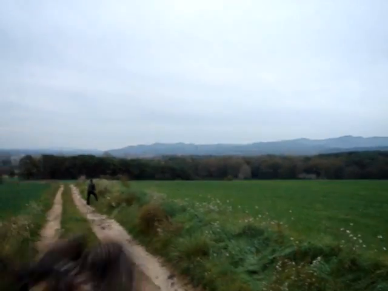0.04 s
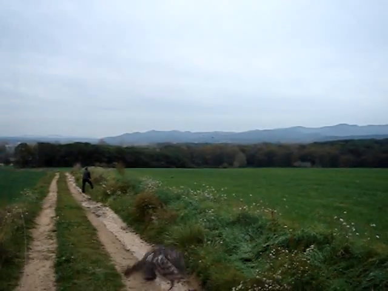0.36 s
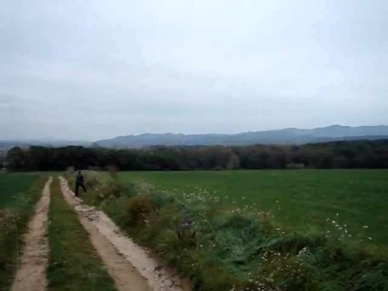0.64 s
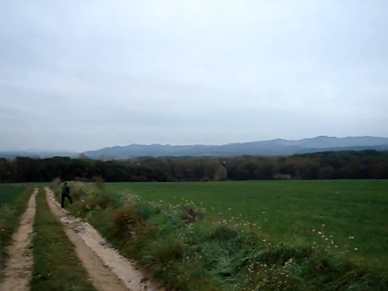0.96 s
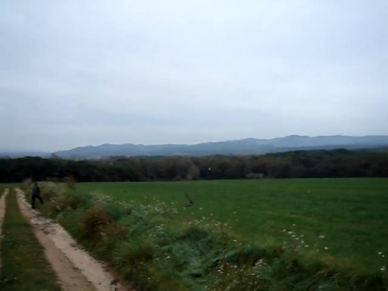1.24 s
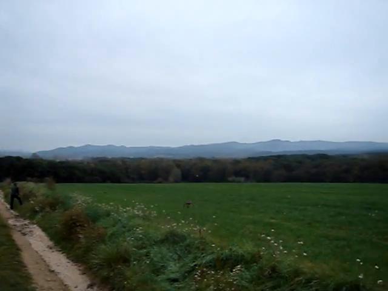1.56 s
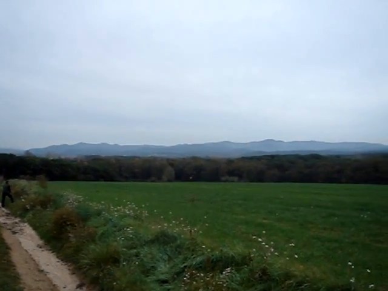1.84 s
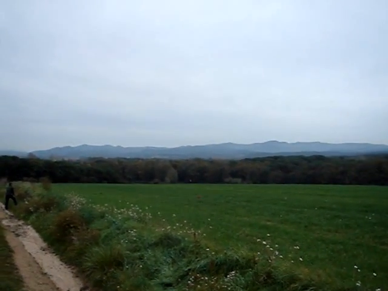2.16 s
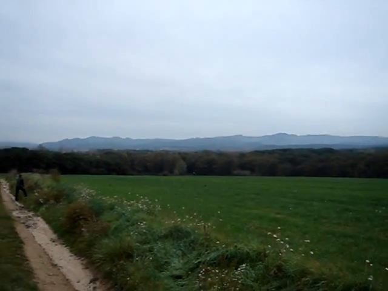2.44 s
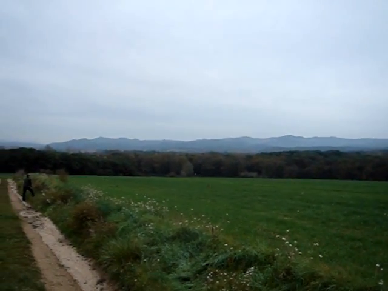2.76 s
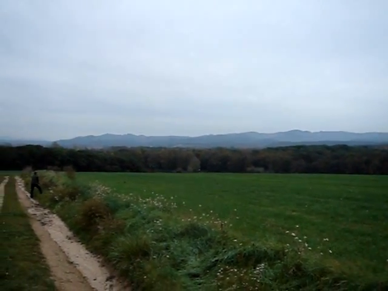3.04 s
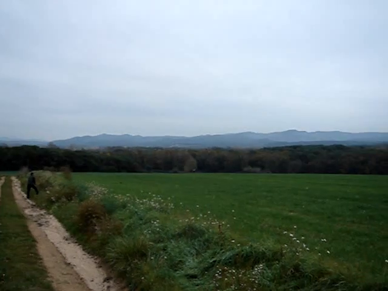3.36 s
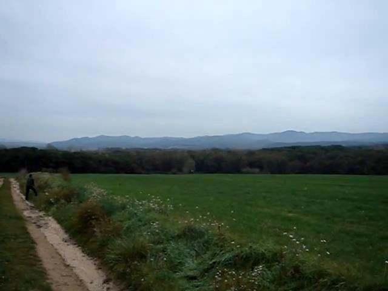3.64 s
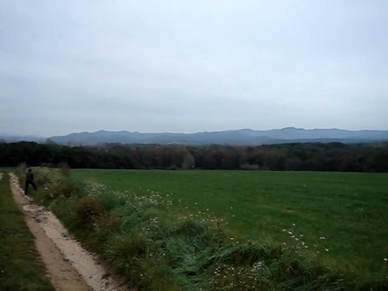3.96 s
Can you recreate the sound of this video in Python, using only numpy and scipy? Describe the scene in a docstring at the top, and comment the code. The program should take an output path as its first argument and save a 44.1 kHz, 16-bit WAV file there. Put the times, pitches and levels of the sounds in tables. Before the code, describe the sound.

Small metal bells jingle on a bird flying away, fading over faint wind.

```python
"""Two small metal bells jingle on a hawk's legs as it takes off beside the microphone and flies away
low over a field. Each wingbeat throws a pellet against a bell's shell: it rattles, the shell rings, and
the pellet chokes the ring. With distance the jingle grows fainter and duller.
The first wingbeat buffets the microphone. Light wind and a faint hum lie far off, a breeze rumbles
softly on the microphone, and one tap and one clink sound close by."""
import sys
import numpy as np
from scipy import signal
from scipy.io import wavfile
from scipy.ndimage import uniform_filter1d

SR = 44100
rng = np.random.default_rng(int(sys.argv[2]) if len(sys.argv) > 2 else 0)


def dump_mix(stems):
    """Bounce the given channels to the path in sys.argv[1] as a 16-bit WAV at rate SR."""
    frames = np.atleast_2d(stems).T  # one column per channel
    limited = np.clip(frames, -1, 1)  # hard clip at full scale
    pcm = np.round(limited * 32767).astype(np.int16)
    wavfile.write(sys.argv[1], SR, pcm)


N = 4 * SR
BELL_ATTACK_S = 0.001

# the hawk's flight away from the microphone (time [s], speed [m/s])
FLIGHT_SPEED = [(0,0.5),(.3,-0.5),(.8,4),(1.5,3.5),(2.2,8),(3,6.5),(4,9.5)]


def amp(db):
    """Decibels to gain."""
    return 10 ** (np.asarray(db) / 20)


def unit_rms(x):
    """Scales to unit rms."""
    return x / np.sqrt(np.mean(x ** 2) + 1e-20)


def spectrum_at(points, hz):
    """Reads a spectrum on a log-frequency axis."""
    f, db = np.transpose(points)
    return np.interp(np.log(hz + 1), np.log(f + 1), db)


def add(mix, s, sound):
    """Mixes a sound in at time s."""
    part = mix[max(round(s * SR), 0):][:len(sound)]
    part += sound[:len(part)]


def coloured(x, points):
    """Causal filter with the given spectrum and unit power gain."""
    gain = unit_rms(amp(spectrum_at(points, abs(np.fft.fftfreq(2048, 1 / SR)))))
    minimum_phase = np.exp(np.conj(signal.hilbert(np.log(gain + 1e-6))))
    return signal.oaconvolve(x, np.fft.ifft(minimum_phase).real)[:len(x)]


def smeared(x, decay_s):
    """Gives every impulse an exponential tail."""
    return signal.lfilter([1], [1, -np.exp(-1 / (decay_s * SR))], x)


def mode(t, hz, db, t60):
    """One dying partial."""
    return amp(db - 60 * t / t60) * np.sin(2 * np.pi * hz * t)


def speed(s):
    """The hawk's speed away from the microphone at time s, in m/s."""
    return np.interp(s, *np.transpose(FLIGHT_SPEED))


def distance(s):
    """Metres the hawk has moved away by time s."""
    return s * speed(np.linspace(0, s)).mean()


def doppler(s):
    """Pitch factor of the receding bird, with sound travelling at 343 m/s."""
    return 1 / (1 + speed(s) / 343)


def far_hum():
    """A thin wavering tone far off, perhaps an engine."""
    # course of the hum (time [s], pitch [Hz], level [dB])
    course = [(.3,394.2,-61.5),(2.5,402.3,-50.5),(3.4,410,-55.5)]
    waver_hz = 6.97
    s, hz, db = np.transpose(course)
    t = np.arange(N) / SR
    waver = unit_rms(uniform_filter1d(uniform_filter1d(rng.standard_normal(N), size=1500), size=1000))
    turns = np.cumsum(np.interp(t, s, hz) + waver_hz * waver) / SR
    return amp(np.interp(t, s, db)) * np.sin(2 * np.pi * turns)


def far_wind():
    """Wind across the field: a soft distant roar with drifting patches, over a faint even hiss."""
    # colour of the roar (frequency [Hz], relative density [dB])
    roar_colour = [(25,-7.5),(170,-16),(300,-7),(420,-3.5),(820,0.5),(1100,-5),(1450,-13.5),(1750,-12.5),(2200,-25.5),(5000,-57)]
    # swell of the roar (time [s], level [dB])
    swell = [(.2,-52),(.55,-47),(.95,-48),(1.2,-45),(1.9,-45),(2.75,-42.5),(4,-43.5)]
    # colour of the hiss (frequency [Hz], relative density [dB])
    hiss_colour = [(100,-33),(1500,0.5),(2600,-1),(5000,-9),(10000,-12.5)]
    patch_db, flicker_db, hiss_db = 0.5, 0.46, -56.5
    frames, hz = N // 256 + 5, np.fft.rfftfreq(1024, 1 / SR)
    real, imag, patches = rng.standard_normal((3, frames, len(hz)))
    patches = unit_rms(uniform_filter1d(uniform_filter1d(patches, size=12, axis=0), size=8, axis=1))
    flicker = unit_rms(uniform_filter1d(rng.standard_normal(frames), size=4))[:, None]
    spectra = (real + 1j * imag) * amp(spectrum_at(roar_colour, hz) + patch_db * patches
                                       + flicker_db * flicker)
    roar = unit_rms(signal.istft(spectra.T, nperseg=1024, noverlap=768)[1][:N])
    level = amp(np.interp(np.arange(N) / SR, *np.transpose(swell)))
    return level * roar + amp(hiss_db) * coloured(rng.standard_normal(N), hiss_colour)


def breeze():
    """A low rumble grows as the breeze slowly picks up at the microphone."""
    # colour of the rumble (frequency [Hz], relative density [dB])
    colour = [(20,2),(80,0.5),(280,-2.5),(900,-40)]
    start_db, rise_db_per_s = -66.5, 3.5
    return amp(start_db + rise_db_per_s * np.arange(N) / SR) * coloured(rng.standard_normal(N), colour)


def tap_and_clink():
    """A dull tap and a tiny metal clink near the microphone, each a few fast-dying modes."""
    # modes of the tap (frequency [Hz], level [dB], t60 [s])
    tap = [(450,-35,.014),(1020,-12,.0045)]
    # modes of the clink (frequency [Hz], level [dB], t60 [s])
    clink = [(5690,-40,0.032),(7220,-24.5,0.027),(8480,-28.5,0.021),(9700,-32,.008)]
    tap_s, clink_s, rise_s = 2.3863, 2.715, 0.0006
    out, t = np.zeros(N), np.arange(SR // 10) / SR
    for s, modes in ((tap_s, tap), (clink_s, clink)):
        add(out, s, (1 - np.exp(-t / rise_s)) * sum(mode(t, *row) for row in modes))
    return out


def wing_buffets():
    """Air from the wings hits the microphone, each puff a push and turbulence; low eddies follow."""
    # puffs on the microphone (time [s], level [dB], decay [s])
    puffs = [(.002,-14,0.014),(.013,-2.5,0.0025),(.024,-15.5,0.0061),(.035,-15,0.011),(.06,-22,0.011),(.405,-38.5,0.005)]
    # colour of a puff (frequency [Hz], relative density [dB])
    puff_colour = [(20,-25),(60,-7),(100,1),(170,-4.5),(280,0),(380,0),(560,-11),(720,-8.5),(1000,-14),(1500,-26),(4000,-39.5),(10000,-54.5)]
    # eddies behind the bird (time [s], level [dB], decay [s])
    eddies = [(.088,-30,0.0092),(.122,-40.5,0.03),(.252,-47,0.033)]
    # colour of an eddy (frequency [Hz], relative density [dB])
    eddy_colour = [(20,1.5),(90,4.5),(160,-8),(300,-18),(10000,-80)]
    out, t = np.zeros(N), np.arange(SR // 4) / SR
    push = 0.77 * (t == 0)  # relative to the turbulence
    for buffets, colour in ((puffs, puff_colour), (eddies, eddy_colour)):
        for s, db, decay_s in buffets:
            envelope = np.exp(-t / decay_s)
            turbulence = envelope * rng.standard_normal(len(t)) / np.linalg.norm(envelope)
            air = coloured(turbulence - push, colour)
            add(out, s, amp(db) * air * np.linalg.norm(envelope) / np.linalg.norm(air))
    return out


def field_scatter(jingle):
    """A short diffuse tail from grass and hedge; its share grows with the bird's speed away."""
    top_speed_db, t60, rise_s = -7.5, 0.071, 0.0052
    t = np.arange(SR // 4) / SR
    tail = rng.standard_normal(len(t)) * amp(-60 * t / t60) * (1 - np.exp(-t / rise_s))
    away = speed(np.arange(N) / SR)
    share = amp(top_speed_db) * away / away.max()
    return signal.fftconvolve(jingle * share, tail / np.linalg.norm(tail))[:N]


def unchoked(t, free_s, choke_s=0.0016):
    """One while the shell rings freely, falling fast once the pellet settles."""
    return np.exp(-np.maximum(t - free_s, 0) / choke_s)


def pellet_strike(s, ring_db, t60, free_s, overtone_db, tick_db):
    """The pellet hits and rebounds in the lower bell, which rings until choked; returns ring and ticks."""
    # the shell with the pellet pressed against it (frequency [Hz], relative level [dB], t60 [s])
    loaded_modes = [(2485,-22.5,0.031),(2640,-14,0.051),(2789,-14.5,0.071),(3050,-16,0.027)]
    # the shell's overtones (frequency [Hz], relative level [dB], t60 [s])
    overtones = [(6300,-2.5,0.31),(6480,-16,0.065),(7165,-3.5,0.15),(7330,-12.5,0.089),(8600,-25,0.06)]
    ring_hz, detune, loaded_spread = 2888.3, 0.0027, 0.027
    rebounds_per_s, rattle_s = 400, 0.029
    choked_db, choked_t60, overtone_choke_s = -22, 0.24, 0.02
    slip_rad, slip_s = 0.54, 0.0029  # each contact drags the pitch down
    ring_kick, overtone_kick, kick_s = 0.2, 1.36, 0.0072  # each rebound disturbs the ring
    dull_db_per_m, spread_db, crack_range_m = 1.7, 3, 7.6

    t = np.arange(SR // 5) / SR
    chance, size, ring_angle, overtone_angle = rng.random((4, len(t)))
    grit = rng.standard_normal(len(t))
    shift = doppler(s) * (1 + detune * rng.standard_normal())
    first_hit = t == 0
    rebounds = (chance < rebounds_per_s / SR) * (t < free_s) * np.exp(-t / rattle_s) * 2 * size

    free = unchoked(t, free_s)
    envelope = free * amp(-60 * t / t60) + (1 - free) * amp(choked_db - 60 * t / choked_t60)
    lag = slip_rad * np.cumsum(smeared(rebounds, slip_s)) / (slip_s * SR)
    shaken = 1 + ring_kick * smeared(rebounds * np.exp(2j * np.pi * ring_angle), kick_s)
    shell = envelope * (shaken * np.exp(1j * (2 * np.pi * ring_hz * shift * t - lag))).imag
    for hz, db, mode_t60 in loaded_modes:
        pressed_hz = hz * shift * (1 + loaded_spread * rng.uniform(-0.93, 1))
        contacts = first_hit + rebounds * envelope * rng.choice([-1, 1], len(t))
        shell += signal.fftconvolve(contacts, mode(t[:SR // 20], pressed_hz, db, mode_t60))[:len(t)]

    shimmer = 1 + overtone_kick * smeared(rebounds * np.exp(2j * np.pi * overtone_angle), kick_s)
    sheen = np.zeros(len(t))
    for hz, db, mode_t60 in overtones:
        contact_db = spread_db * rng.standard_normal()  # each contact point favours other overtones
        distance_loss_db = dull_db_per_m * distance(s) * ((hz / overtones[0][0]) ** 2 - 1)
        partial = (shimmer * np.exp(1j * (2 * np.pi * hz * shift * t - lag))).imag
        sheen += amp(db + contact_db - distance_loss_db - 60 * t / mode_t60) * partial
    sheen *= unchoked(t, free_s, overtone_choke_s)  # damped more slowly than the main ring
    ring = (1 - np.exp(-t / BELL_ATTACK_S)) * (amp(ring_db) * shell + amp(overtone_db) * sheen)

    crack = 2.8 * np.exp(-distance(s) / crack_range_m) * first_hit  # hardest near the microphone
    rattle = grit * smeared(first_hit + 0.15 * rebounds, decay_s=0.0015)
    return ring, amp(tick_db) * (crack + rattle)


def pellet_jostle():
    """The pellet keeps rolling and touching the shell at random, too softly to wake the overtones."""
    slot_s, mean_db, t60 = 0.1, -47, 0.05  # one touch in each slot
    out = np.zeros(N)
    for s in np.arange(0, N / SR, slot_s):
        delay, force = rng.random(2)
        ring_db = mean_db + 6 * (force - 0.5)
        ring, _ = pellet_strike(s, ring_db, t60, slot_s / 2, overtone_db=-np.inf, tick_db=-np.inf)
        add(out, s + delay * slot_s, ring)
    return out


def high_bell():
    """The fainter, higher bell: two shell modes ring until the pellet chokes them."""
    # pellet strikes (time [s], level [dB], time until choked [s])
    strikes = [(.032,-38,0.023),(0.068,-40.5,0.22),(0.216,-38,0.061),(.381,-47,0.016),(.446,-49,0.023),(.513,-42,0.027),(.583,-36,0.015),(.785,-34,.02),(.802,-33,0.057),(.91,-51,0.051),(2.098,-53,0.028),(3.167,-55,.05),(3.364,-53,.1)]
    # modes of the shell at rest (frequency [Hz], relative level [dB])
    modes = [(3255,3.5),(6285,-17)]
    out, t = np.zeros(N), np.arange(SR // 4) / SR
    for s, db, free_s in strikes:
        ring = sum(mode(t, hz * doppler(s), db + mode_db, t60=0.51) for hz, mode_db in modes)
        add(out, s, ring * (1 - np.exp(-t / BELL_ATTACK_S)) * unchoked(t, free_s))
    return out


def low_bell():
    """The louder, lower bell rings and ticks, falling slightly in pitch as the bird gathers speed."""
    # pellet strikes (time [s], ring level [dB], t60 [s], time until choked [s],
    # overtone level [dB], relative tick level [dB])
    strikes = [(0.06, -4.5, 0.0077, 0.0067, -42, -35.5), (0.07, -7.5, 0.04, 0.0064, -46, -36),
               (0.076, -12, 0.3, 0.015, -55, -46), (0.087, -22, 0.28, 0.049, -43, -40),
               (0.13, -28.5, 0.32, 0.035, -63, -42), (0.187, -13.5, 0.16, 0.015, -52, -48),
               (0.203, -24, 0.4, 0.012, -52, -51), (0.215, -15.5, 0.2, 0.0065, -37, -38),
               (0.221, -18.5, 0.33, 0.06, -37.5, -41.5), (0.261, -21, 0.28, 0.05, -44, -54),
               (0.289, -17, 0.19, 0.07, -46, -58), (0.335, -11.5, 0.055, 0.017, -40.5, -54),
               (0.366, -23.5, 0.24, 0.016, -51.5, -61), (0.381, -18.5, 0.11, 0.031, -45, -41.5),
               (0.418, -29, 0.4, 0.013, -61, -69), (0.446, -22.5, 0.31, 0.019, -40.5, -40),
               (0.461, -18.5, 0.098, 0.039, -54, -51), (0.486, -31.5, 0.3, 0.0048, -73, -67),
               (0.509, -15, 0.56, 0.015, -42, -59), (0.522, -15.5, 0.18, 0.04, -46, -41),
               (0.583, -16, 0.3, 0.015, -37, -37.5), (0.605, -22, 0.32, 0.022, -44, -65),
               (0.636, -21.5, 0.5, 0.015, -47, -60), (0.648, -14, 0.17, 0.029, -52, -47),
               (0.677, -23, 0.12, 0.02, -47.5, -50), (0.716, -29, 0.38, 0.036, -51.5, -55),
               (0.732, -25.5, 0.17, 0.07, -59, -48), (0.782, -16.5, 0.26, 0.052, -39.5, -44),
               (0.869, -23.5, 0.41, 0.01, -46, -48.5), (0.93, -19, 0.022, 0.0071, -52, -47),
               (0.947, -30.5, 0.16, 0.053, -50.5, -62), (1.034, -30, 0.097, 0.016, -61, -75),
               (1.063, -42.5, 0.2, 0.046, -67, -76), (1.108, -34, 0.038, 0.016, -64, -72),
               (1.189, -31, 0.24, 0.052, -66, -68), (1.273, -26.5, 0.093, 0.023, -70, -49.5),
               (1.296, -33.5, 0.26, 0.0096, -63, -72), (1.356, -39, 0.34, 0.017, -69, -76),
               (1.387, -38, 0.08, 0.014, -71, -76), (1.45, -35, 0.4, 0.032, -58, -53.5),
               (1.506, -32, 0.38, 0.049, -61.5, -70), (1.614, -24, 0.066, 0.045, -56.5, -55),
               (1.692, -37.5, 0.37, 0.0048, -63, -66), (1.775, -33, 0.043, 0.021, -72, -69),
               (1.798, -43, 0.12, 0.0091, -69, -74), (1.953, -28.5, 0.16, 0.058, -64, -75),
               (2.022, -38.5, 0.21, 0.038, -60, -58), (2.086, -31, 0.091, 0.035, -55, -52),
               (2.182, -40, 0.1, 0.068, -71, -70), (2.295, -31, 0.083, 0.019, -68, -64),
               (2.311, -31.5, 0.17, 0.014, -69, -74), (2.322, -31.5, 0.12, 0.012, -70, -71),
               (2.351, -35, 0.035, 0.053, -70, -67), (2.418, -40.5, 0.075, 0.0083, -79, -69),
               (2.449, -33, 0.076, 0.073, -67, -65), (2.572, -38, 0.14, 0.097, -65, -64),
               (2.652, -37, 0.4, 0.012, -57.5, -57), (2.665, -34, 0.11, 0.091, -62, -58),
               (2.733, -36, 0.16, 0.035, -79, -69), (2.791, -36.5, 0.16, 0.045, -64, -61),
               (3.008, -30, 0.16, 0.063, -60, -59), (3.098, -34, 0.085, 0.05, -54, -63),
               (3.164, -30.5, 0.11, 0.124, -57.5, -62), (3.31, -50, 0.22, 0.022, -64, -80),
               (3.363, -30, 0.044, 0.07, -66, -61), (3.413, -41, 0.7, 0.057, -72, -65),
               (3.453, -34.5, 0.12, 0.035, -70, -68), (3.51, -37.5, 0.12, 0.042, -61, -72),
               (3.542, -34.5, 0.096, 0.118, -66, -66), (3.731, -32, 0.21, 0.14, -65, -62),
               (3.881, -41, 0.046, 0.119, -75, -72)]
    # colour of the contact tick (frequency [Hz], relative density [dB])
    tick_colour = [(100,-44),(1400,-23),(2000,-6.5),(2450,13.5),(3500,8.5),(5200,-6),(7200,-4.5),(10000,-14.5)]
    tick_gain_db = 15
    rings, ticks = np.zeros((2, N))
    for s, *settings in strikes:
        ring, tick = pellet_strike(s, *settings)
        add(rings, s, ring)
        add(ticks, s, tick)
    return rings + amp(tick_gain_db) * coloured(ticks, tick_colour)


def scene():
    """The hawk's bells and wings over the open field, heard at one fixed microphone."""
    jingle = low_bell() + high_bell() + pellet_jostle()
    bells = jingle + field_scatter(jingle)
    background = far_wind() + breeze() + far_hum()
    return (bells + background + wing_buffets() + tap_and_clink())[None]


def record(dry):
    """The microphone's bass cut and the recorder's band limit."""
    low_cut_hz, band_limit_hz = 45, 10080
    heard = signal.sosfilt(signal.butter(2, low_cut_hz, "highpass", fs=SR, output="sos"), dry)
    lowpass = signal.firwin(511, band_limit_hz, window=("kaiser", 9), fs=SR)
    return signal.oaconvolve(heard, lowpass[None], "same")


dry = scene()
out = record(dry)
dump_mix(out)
```